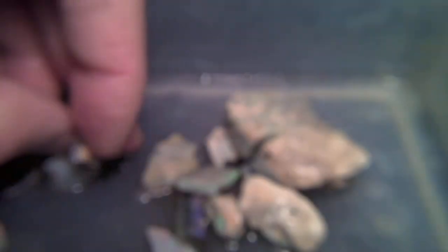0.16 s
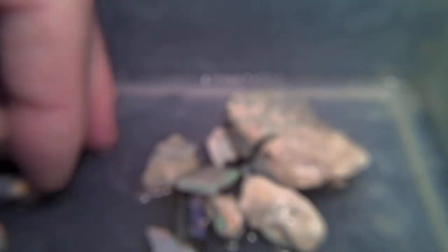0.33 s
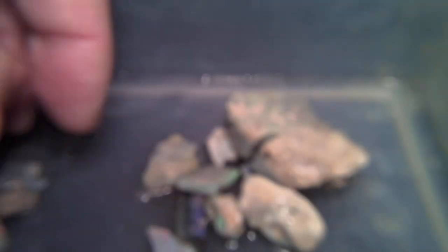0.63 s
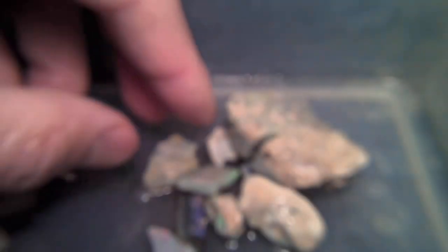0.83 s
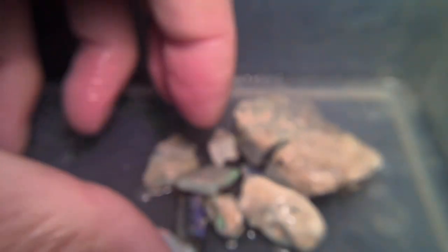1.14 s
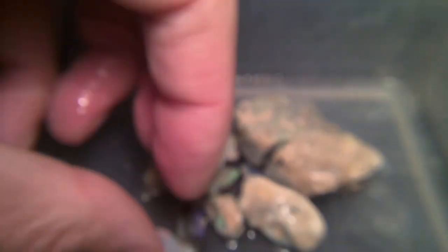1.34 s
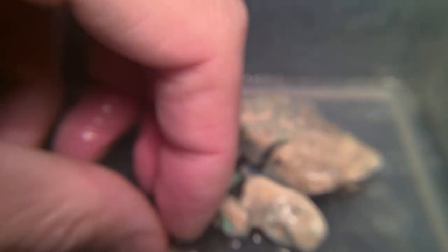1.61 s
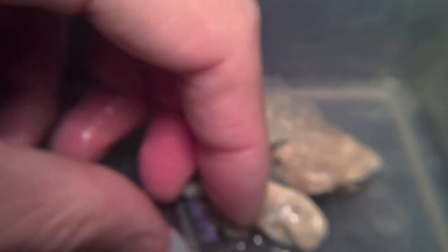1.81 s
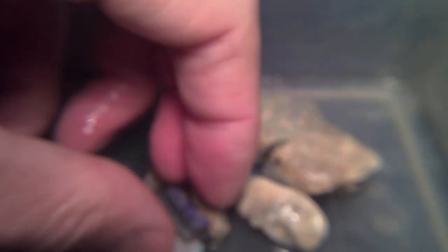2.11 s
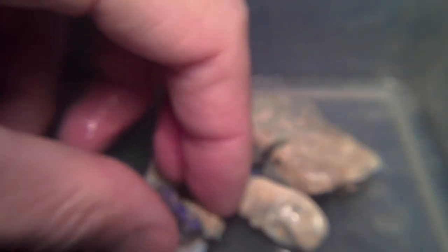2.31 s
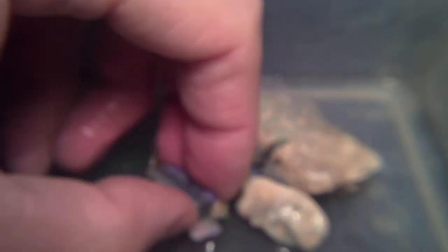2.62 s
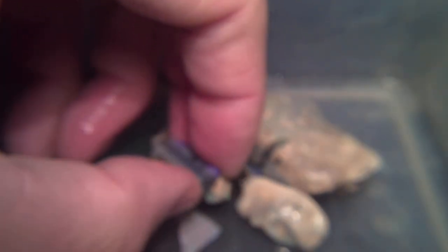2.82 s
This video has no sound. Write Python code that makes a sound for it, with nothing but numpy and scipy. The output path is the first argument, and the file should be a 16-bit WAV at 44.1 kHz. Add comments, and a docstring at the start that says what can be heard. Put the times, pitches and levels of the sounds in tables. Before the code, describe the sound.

Little rough stones tick, rattle and slide on plastic, sorted by hand up close.

```python
"""Sorting stones in a plastic tray

A small room, a stereo microphone close to the tray. Fingers pick through small rough stones: each contact
is a push and a brief chatter that ring the floor and walls and make the stone tick. In between, stones
scrape, fingertips rub and thump, and thin chips ring. Soft handling rumble and room air lie underneath."""
import sys
import numpy as np
from scipy import signal
from scipy.fft import rfft, irfft
from scipy.io import wavfile

SR = 44100
rng = np.random.default_rng(int(sys.argv[2]) if len(sys.argv) > 2 else 0)


def transcribe(u):
    """Save the signal u as a 16-bit wav file named by the first command-line argument.

    u: samples, shape (n,) or (channels, n), limited to [-1, 1]; the rate is SR.
    q: integer samples, one column per channel.
    """
    v = np.clip(np.atleast_2d(u).T, -1, 1)
    q = np.round(v * 32767).astype(np.int16)
    wavfile.write(sys.argv[1], SR, q)


N = 130095

# Spectrum of the room's air (frequency [Hz], relative level [dB])
AIR_SPECTRUM = [(30, 9.5), (700, -22.5), (2000, -43), (16000, -45.5)]
# Handling rumble on the right of the microphone (time [s], level [dB])
RUMBLE_LEVELS = [(0, -73), (.6, -48), (1.23, -54), (1.35, -64.5), (2.65, -59), (2.95, -83)]
# A fingertip rubbing the tray (time [s], floor level [dB], wall level [dB])
RUB_LEVELS = [(.04, -106, -115), (.14, -75.5, -108), (.79, -93.5, -100), (.84, -58, -63.5),
              (.93, -62.5, -83), (.97, -55, -69), (1.2, -61, -68), (1.39, -67.5, -101.5),
              (1.43, -88.5, -108)]
# Stones scraping the plastic (time [s], tray level [dB], wall level [dB])
SCRAPE_LEVELS = [(.228, -103, -94), (.247, -46, -52.5), (.39, -45.5, -57), (.44, -65, -67.5),
                 (.6, -53, -67.5), (.74, -78, -91.5), (1.485, -83, -105), (1.51, -49, -58.5),
                 (1.58, -64, -72), (1.6, -53, -50.5), (1.885, -52.5, -55), (1.905, -37.5, -45.5),
                 (1.955, -50.5, -47), (1.977, -37, -45.5), (2.005, -56, -51), (2.075, -40.5, -41.5),
                 (2.115, -51.5, -52.5), (2.16, -40.5, -50), (2.228, -72, -68), (2.25, -46, -54),
                 (2.31, -48.5, -45), (2.345, -49, -54), (2.435, -56, -56), (2.57, -45.5, -53.5),
                 (2.73, -53, -59.5), (2.77, -78, -86)]
# Stones landing or slipping (time [s], chatter [ms], tray knock [dB], wall clack [dB], stone tick [dB])
STONE_CONTACTS = [(0.2375, 2.3, -39, -64, -80), (0.2762, 1.2, -41, -44.5, -51.5),
                  (0.2838, 3.5, -38, -46, -50), (0.4051, 1.04, -31, -40.5, -60.5),
                  (0.4992, 0.85, -49.5, -53.5, -62.5), (0.5479, 0.31, -43, -62.5, -87),
                  (0.6117, 4, -42, -52, -59.5), (0.631, 1.28, -33.5, -31, -41.5),
                  (0.8087, 0.37, -40, -46.5, -99), (1.0782, 0.33, -40, -50.5, -65),
                  (1.0875, 0.93, -41.5, -40.5, -49.5), (1.5213, 3.85, -46.5, -46.5, -59.5),
                  (1.545, 5.2, -49.5, -50, -59.5), (1.6523, 2.6, -39, -41.5, -48.5),
                  (1.6852, 1.56, -36, -39.5, -48.5), (1.7017, 1.7, -38.5, -39, -46),
                  (1.7422, 0.74, -38.5, -39, -38), (1.7769, 0.65, -42.5, -34.5, -40.5),
                  (1.8954, 3.8, -45, -40.5, -37), (1.9226, 0.77, -32.5, -39, -45),
                  (1.9837, 1.9, -43, -43, -44), (2.033, 1.5, -39, -50, -49),
                  (2.0449, 2.2, -50.5, -45, -55.5), (2.0634, 1.1, -38.5, -48, -55),
                  (2.0759, 4.1, -45, -36.5, -46.5), (2.0861, 1.74, -36, -43.5, -64),
                  (2.1324, 1.1, -43.5, -47.5, -66), (2.1872, 4, -43, -47.5, -59),
                  (2.275, 1.8, -41.5, -41.5, -79), (2.2828, 1, -34.5, -38.5, -70),
                  (2.2905, 2.3, -39.5, -40.5, -45.5), (2.4555, 0.37, -42.5, -39.5, -67.5),
                  (2.4654, 0.17, -47, -45.5, -52), (2.485, 4.8, -47, -41.5, -51),
                  (2.5844, 2.6, -48, -40.5, -60), (2.773, 0.33, -50, -50, -45.5),
                  (2.882, 2, -55.5, -54.5, -58.5)]
# Fingertips thumping the floor (time [s], level [dB])
FINGER_THUMPS = [(0.24, -47.5), (0.81, -41), (0.8204, -43), (1.076, -45), (1.0872, -37), (1.912, -42)]
# Taps on thin chips of stone (time [s], pitch [Hz], level [dB])
CHIP_TAPS = [(0.948, 2144, -62.5), (.958, 1355, -54), (1.8957, 2124, -35.5), (2.885, 1476, -50)]
# Modes of the tray's flexing floor (frequency [Hz], relative level [dB], T60 [s])
FLOOR_MODES = [(181.7, -0.5, 0.019), (297, -1.5, 0.021), (473.3, 4, 0.044)]
# Modes of the tray's body (frequency [Hz], relative level [dB], T60 [s])
TRAY_MODES = [(518, -5.5, 0.058), (696, 4.5, 0.023), (868.6, 15, 0.021), (870, -14.5, 0.072)]
# Modes of the tray's walls (frequency [Hz], relative level [dB], T60 [s])
WALL_MODES = [(1383, -12.5, 0.06), (1732, 5.5, 0.024), (1991, 7.5, 0.017), (2598, -2.5, 0.014),
              (3025, -5, 0.028), (3660, -2, 0.0054)]
# Modes of the stones (frequency [Hz], relative level [dB], T60 [s])
STONE_MODES = [(4516, 3, 0.036), (6620, 7.5, 0.016), (9600, 1, 0.0036), (13200, 0.5, 0.0058)]

PLASTIC_DETUNE, STONE_DETUNE = .04, .09  # relative scatter of the mode frequencies
WALL_WIDTH_RAD, STONE_WIDTH_RAD = .44, .98  # phase scatter between left and right
RING_SAMPLES = 4096


def amp(db):
    """Decibels to gain."""
    return 10 ** (np.asarray(db) / 20)


def unit(x):
    """Scale to rms 1."""
    return x / np.sqrt(np.mean(x ** 2) + 1e-20)


def filt(x, hz, kind, order=2):
    """Butterworth filter."""
    sos = signal.butter(order, np.minimum(hz, SR / 2 - 100), kind, fs=SR, output="sos")
    return signal.sosfilt(sos, x)


def curve(table, column=1):
    """Gain over time from one dB column."""
    rows = np.array(table, float)
    return amp(np.interp(np.arange(N) / SR, rows[:, 0], rows[:, column]))


def place(events):
    """Mix (time, sound) pairs; a sound's level counts as if all its energy fell within 10 ms."""
    track = np.zeros((2, N + RING_SAMPLES))
    for start, sound in events:
        i = int(start * SR)
        track[:, i:i + RING_SAMPLES] += sound * np.sqrt(.01 * SR / RING_SAMPLES)
    return track[:, :N]


def ring(modes, detune=PLASTIC_DETUNE, width_rad=0.):
    """Stereo response of decaying modes, struck at a random spot."""
    hz, db, t60 = np.array(modes, float).T[:, :, None]
    t = np.arange(RING_SAMPLES) / SR
    level_draw, pitch_draw, *phase_draws = rng.standard_normal((4, len(hz), 1))
    fade = amp(db + 3.5 * level_draw) * amp(-60 * t / t60)
    phase = 2 * np.pi * hz * (1 + detune * pitch_draw) * t
    return np.array([(fade * np.sin(phase + width_rad * draw)).sum(0) for draw in phase_draws])


def excite(force, response):
    """Drive a stereo response with a force."""
    return signal.fftconvolve(force[None], response, axes=1)[:, :len(force)]


def resonances(force, crack_db=6.5, crack_s=.003):
    """What a force rings: the flexing floor, the tray's body, its walls and the stone with its crack."""
    floor = filt(excite(force, ring(FLOOR_MODES)), [165, 650], "bandpass")
    tray = filt(excite(force, ring(TRAY_MODES)), [330, 1800], "bandpass")
    wall = filt(excite(force, ring(WALL_MODES, width_rad=WALL_WIDTH_RAD)), [1150, 4300], "bandpass", 5)
    stone = ring(STONE_MODES, STONE_DETUNE, STONE_WIDTH_RAD)
    crack = filt(rng.standard_normal(stone.shape), 4200, "lowpass", order=1)
    crack *= np.exp(-np.arange(RING_SAMPLES) / SR / crack_s)
    tick = filt(excite(force, unit(stone) + amp(crack_db) * unit(crack)), 2100, "highpass")
    return floor, tray, wall, tick


def grains(size, per_s=3000, spread_db=9, limit=2.4):
    """Random tiny impacts of rough edges, some larger than the rest, up to a soft limit."""
    strengths = rng.standard_normal(size) * amp(spread_db * rng.exponential(size=size))
    return (rng.random(size) < per_s / SR) * limit * np.tanh(strengths / limit)


def room_air(level_db=-65):
    """Faint steady air of the room, partly shared by both sides of the microphone."""
    hz, db = np.array(AIR_SPECTRUM, float).T
    bin_hz = np.arange(N // 2 + 1) * SR / N
    gain = amp(np.interp(np.log(bin_hz + 1), np.log(hz), db))
    noise = rng.standard_normal((2, N)) + rng.standard_normal(N)
    return amp(level_db) * unit(irfft(rfft(noise) * gain, N))


def handling(bump_at_s=.566, bump_hz=59.8, hold_s=.025, decay_s=.046, left_db=-9.5):
    """Low rumble and one bump of the moving hand, mostly on the right."""
    rumble = unit(filt(rng.standard_normal((2, N)), [23.1, 61], "bandpass"))
    age = np.maximum(np.arange(N) / SR - bump_at_s, 0)
    swell = np.minimum(age * bump_hz * 2, 1) * np.exp(-np.maximum(age - hold_s, 0) / decay_s)
    bump = amp(-29) * swell * np.sin(2 * np.pi * bump_hz * age + rumble / 2)
    return (rumble * curve(RUMBLE_LEVELS) + bump) * amp([[left_db], [0]])


def finger_rubbing():
    """Soft skin slides on the plastic: smooth friction stirs only the low modes of floor and walls."""
    floor, tray, wall, _ = resonances(rng.standard_normal(N))
    murmur = unit(filt(unit(floor) + unit(tray), 786, "lowpass", order=6))
    hollow = unit(filt(wall, 2150, "lowpass"))
    return murmur * curve(RUB_LEVELS) + hollow * curve(RUB_LEVELS, column=2)


def stone_scraping(spots=6, grains_per_s=2600, judder_hz=149.4, judder_db=3, grit_growth=1.93):
    """Stones stick and slip over the plastic at several spots; pressure brings out the grit."""
    wander = np.interp(np.arange(N) / SR * judder_hz, np.arange(2048), rng.standard_normal(2048))
    judder = amp(judder_db * wander)
    scrapes = [resonances(grains(N, grains_per_s / spots, spread_db=5.5) * judder) for _ in range(spots)]
    floor, tray, wall, grit = (unit(sum(layer)) for layer in zip(*scrapes))
    grit = filt(unit(grit * np.sqrt(judder)), 11100, "lowpass")
    wall_gain = curve(SCRAPE_LEVELS, column=2)
    grit_gain = amp(-56.5) * (wall_gain / amp(-49)) ** grit_growth  # outgrows the walls under pressure
    return (tray + amp(-5.5) * floor) * curve(SCRAPE_LEVELS) + wall * wall_gain + grit * grit_gain


def contact_force(chatter_ms, slip_ms=3.44, settle_s=.01):
    """One push and a chatter of edges; a long chatter is a slip, which swells instead of striking."""
    t = np.arange(RING_SAMPLES) / SR
    age = t * 1000 / chatter_ms
    slip = 1 - np.exp(-(chatter_ms / slip_ms) ** 2)
    force = .57 * grains(RING_SAMPLES) * (1 - slip + 2 * slip * age) * np.exp(-age)
    force += .065 * grains(RING_SAMPLES) * np.exp(-t / settle_s)  # crunches on briefly after landing
    force[0] += 1 - slip  # the push
    return force


def stone_contacts(top_hz=17900):
    """Stones land or slip: the tray knocks, the walls clack, the stone ticks. Harder is brighter."""
    for start, chatter_ms, knock_db, clack_db, tick_db in STONE_CONTACTS:
        floor, tray, wall, stone = resonances(contact_force(chatter_ms))
        hardness_db = tick_db - knock_db
        knock = unit(tray) + amp(-19) * unit(floor)
        clack = unit(filt(wall, top_hz * amp(.27 * hardness_db), "lowpass"))
        tick = unit(filt(stone, max(4960, top_hz * amp(.74 * hardness_db)), "lowpass", order=3))
        yield start, amp(knock_db) * knock + amp(clack_db) * clack + amp(tick_db) * tick


def finger_thumps():
    """A fingertip landing on the tray only flexes the floor."""
    for start, db in FINGER_THUMPS:
        yield start, amp(db) * unit(ring(FLOOR_MODES))


def chip_taps(ratios=(1, 1.65, 2.1), t60_s=.035):
    """Thin chips of stone are tapped and ring at a few partials, the high ones faintly."""
    for start, hz, db in CHIP_TAPS:
        chip = ring([(hz * ratio, 0, t60_s) for ratio in ratios], detune=0, width_rad=WALL_WIDTH_RAD)
        yield start, amp(db) * unit(filt(chip, 2900, "lowpass", order=6))


def reflections(direct, t60_s, build_s=.0017, split_hz=1488, size=16384):
    """Dense reflections build up and die away; the lows reach both sides of the microphone alike."""
    t = np.arange(size) / SR
    noise = rng.standard_normal((3, size))
    tail = filt(noise[0], split_hz, "lowpass", order=3) + filt(noise[1:], split_hz, "highpass", order=3)
    tail = filt(tail, 324, "highpass", order=1)
    tail *= amp(-60 * t / t60_s) * (1 - np.exp(-t / build_s))
    return signal.fftconvolve(direct, unit(tail) / np.sqrt(size), axes=1)[:, :N]


def scene():
    """The tray up close with its own reflections, the small room behind it, handling and air."""
    close = place([*stone_contacts(), *finger_thumps(), *chip_taps()])
    close += stone_scraping() + finger_rubbing()
    close[0] = np.pad(close[0], (2, 0))[:N]  # reaches the left side two samples later
    early = amp(-5.5) * reflections(close, t60_s=.018)
    room = amp(-15) * reflections(close, t60_s=.26)
    return close + early + room + handling() + room_air()


def record(dry):
    """The recorder cuts the top steeply above 15.9 kHz."""
    return signal.sosfilt(signal.ellip(8, .2, 80, 15900, fs=SR, output="sos"), dry)


dry = scene()
out = record(dry)
transcribe(out)
```